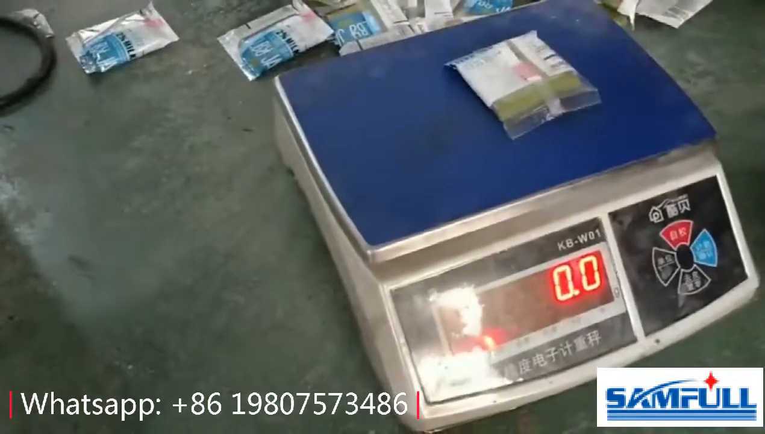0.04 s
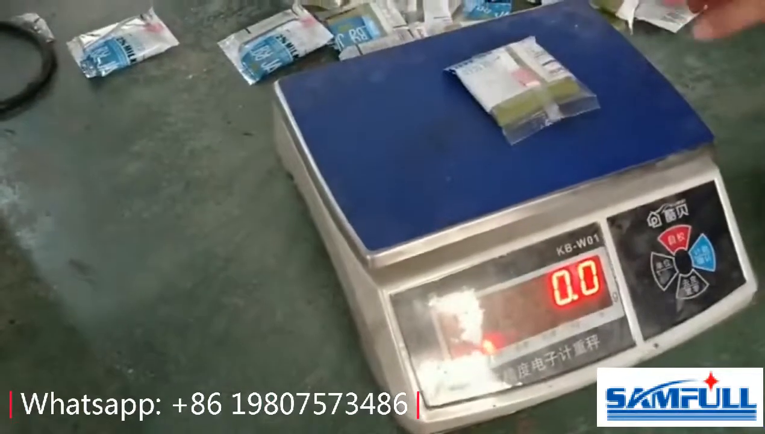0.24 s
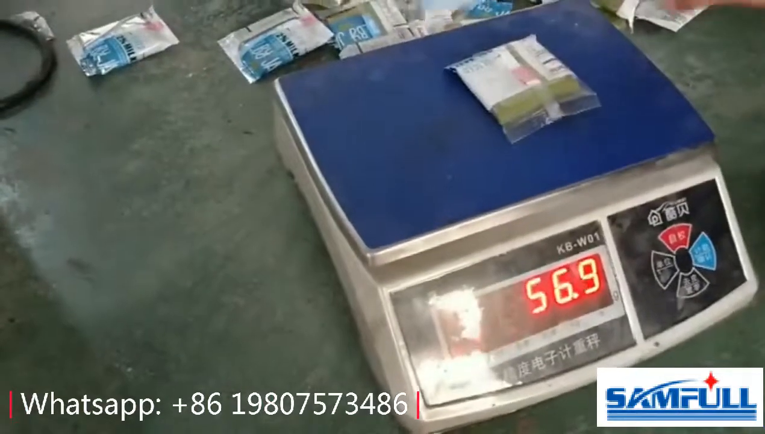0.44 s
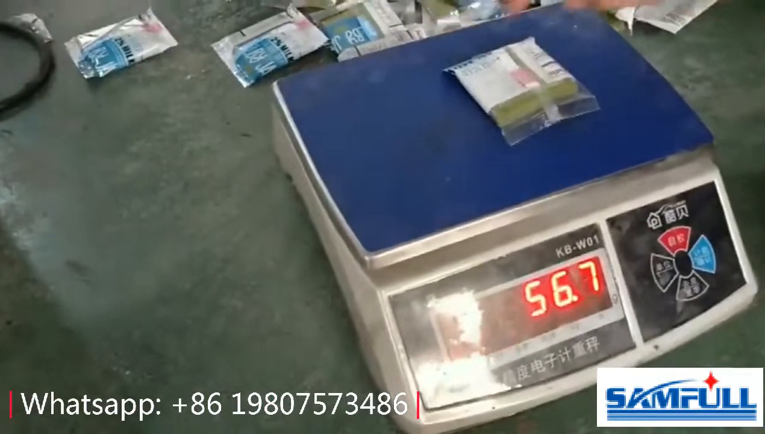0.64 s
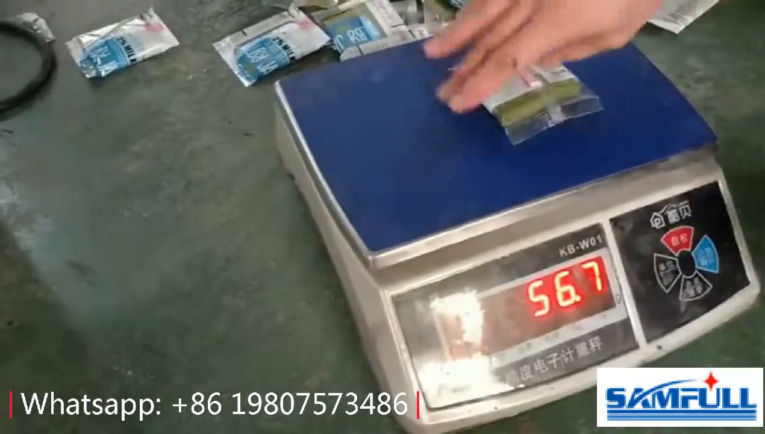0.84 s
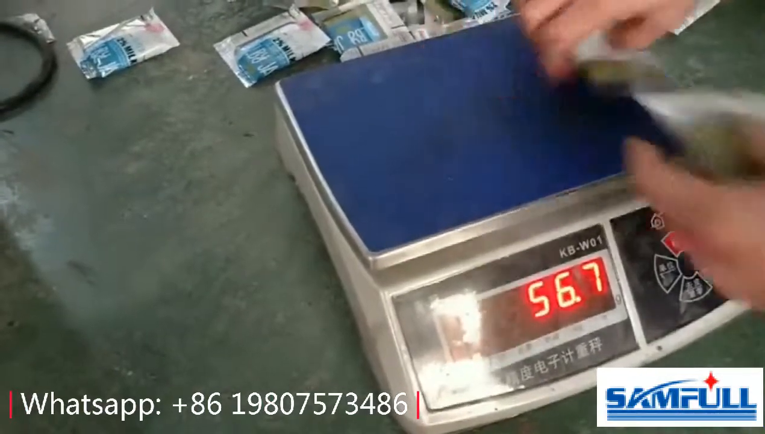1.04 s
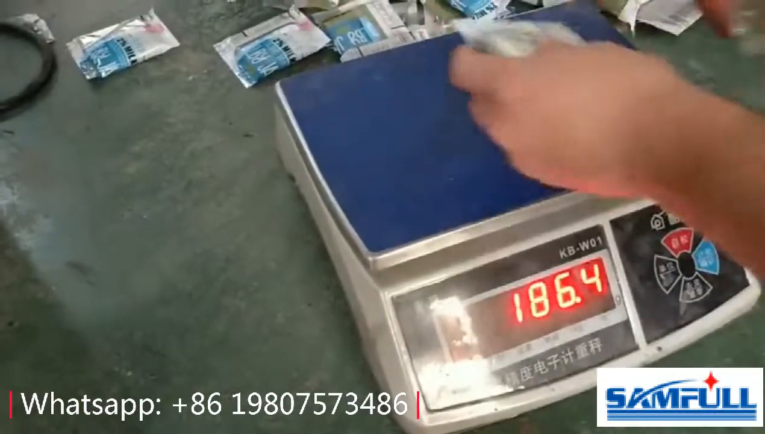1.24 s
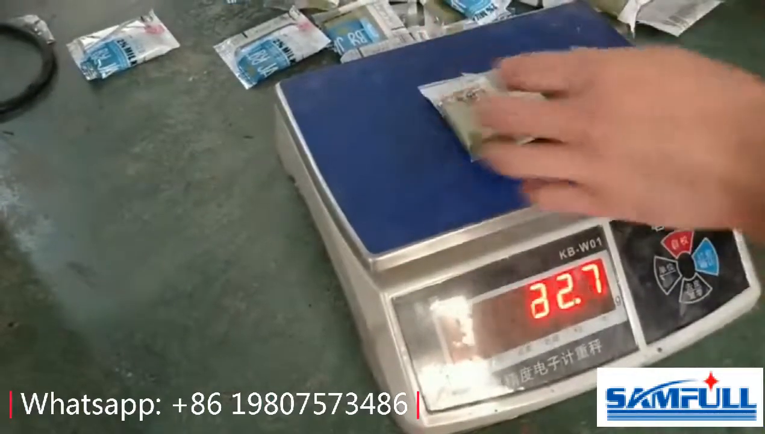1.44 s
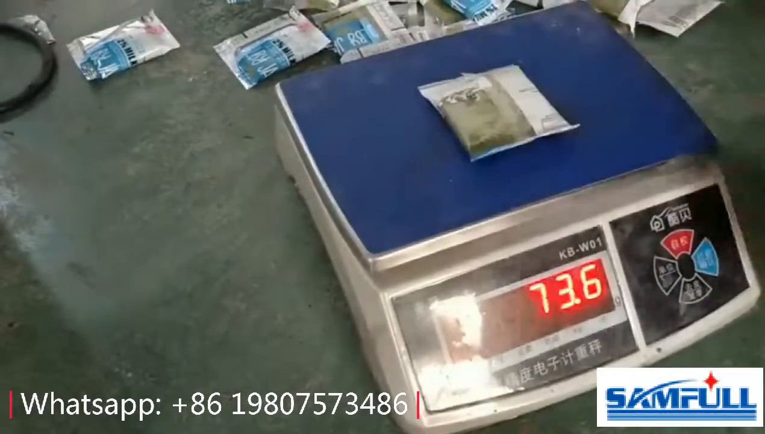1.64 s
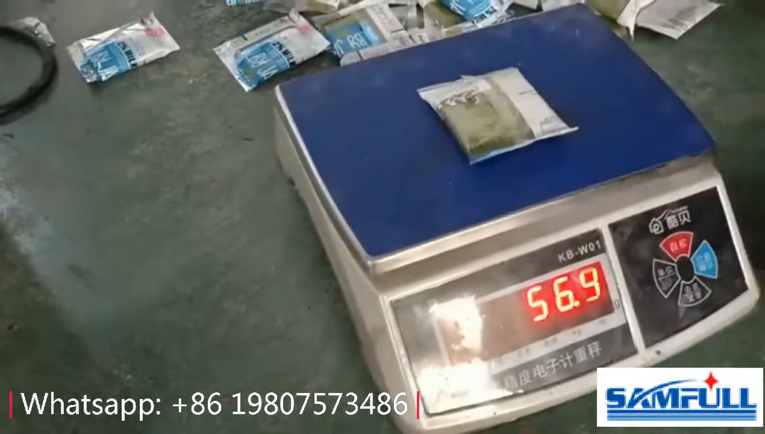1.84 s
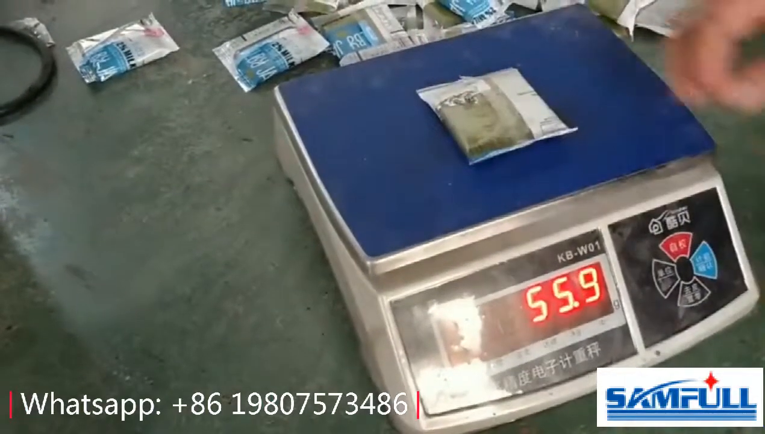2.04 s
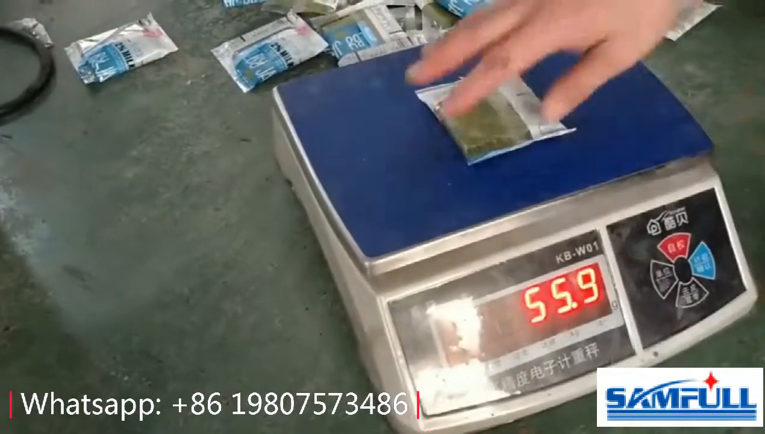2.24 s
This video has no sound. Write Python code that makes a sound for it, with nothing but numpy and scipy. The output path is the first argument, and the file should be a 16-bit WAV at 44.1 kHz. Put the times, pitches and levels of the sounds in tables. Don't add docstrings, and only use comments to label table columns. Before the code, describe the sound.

Crinkly filled packets slap and rattle a metal scale pan over droning factory machines and thin whine

```python
import sys
import numpy as np
from scipy import signal
from scipy.fft import rfft, irfft
from scipy.io import wavfile
from scipy.ndimage import uniform_filter1d

SR = 44100
rng = np.random.default_rng(int(sys.argv[2]) if len(sys.argv) > 2 else 0)


def pcm_store(signal):
    levels = np.round(np.clip(np.atleast_2d(signal), -1, 1) * 32767)
    wavfile.write(sys.argv[1], SR, levels.astype(np.int16).T)


def how_loud(loudness_db):
    steps = np.asarray(loudness_db, float) / 20
    return 10 ** steps


N = 101429
HZ = np.maximum(np.fft.rfftfreq(N, 1 / SR), 1)
TIME = np.arange(N) / SR


def rms_one(x):
    return x / np.sqrt(np.mean(x ** 2) + 1e-20)


def at_hz(points, hz):
    table_hz, values = np.array(points).T[:2]
    return np.interp(np.log(hz), np.log(table_hz), values)


def colour(x, spectrum):
    return rms_one(irfft(rfft(x) * how_loud(at_hz(spectrum, HZ)), N))


def ring(clicks, hz, t60_s):
    radius = how_loud(-60 / (t60_s * SR))
    turn = 2 * np.pi * hz / SR
    return signal.lfilter([0, np.sin(turn)], [1, -2 * radius * np.cos(turn), radius ** 2], clicks + 1e-18)


def grains(per_s, spread_db):
    sizes = how_loud(spread_db * np.minimum(rng.exponential(1, N), 4.0))
    signs = rng.choice([-1, 1], N)
    return rms_one(sizes * signs * (rng.random(N) < per_s / SR))


def swell(start_s, rise_s, t60_s):
    t = TIME - start_s
    rise = np.sin(np.pi / 2 * np.clip(t / rise_s, 0, 1)) ** 2
    return rise * how_loud(-60 * np.maximum(t - rise_s, 0) / t60_s)


# (frequency [Hz], correlation [-])
LIKENESS = [(60, 1), (250, 0.94), (700, 0.7), (1400, 0.029), (12000, 0.)]


def spread(mid, side):
    alike = np.clip(at_hz(LIKENESS, HZ), -.99, .999)
    m = rfft(mid) * np.sqrt((1 + alike) / 2)
    s = rfft(side) * np.sqrt((1 - alike) / 2)
    return irfft(np.array([m + s, m - s]), N)


# (frequency [Hz], t60 [s])
HALL_T60 = [(60, 8.3), (300, 1.23), (1000, 0.61), (4000, 0.41), (12000, 0.68)]


def hall(x):
    t = TIME[:SR]
    tail = 0
    for hz in 45 * 2 ** np.arange(9):
        octave = signal.butter(2, [hz / np.sqrt(2), hz * np.sqrt(2)], "band", fs=SR, output="sos")
        noise = signal.sosfilt(octave, rng.standard_normal((2, SR)))
        fade = how_loud(-60 * t / at_hz(HALL_T60, hz)) * np.clip(t / 0.0052, 0, 1)
        tail = tail + noise * fade / np.sqrt(np.sum(fade ** 2))
    return how_loud(-5.5) * spread(*[signal.fftconvolve(x, side)[:N] for side in tail])


# (frequency [Hz], level [dB per Hz])
DRONE = [(25, -19), (70, -3), (200, 3), (700, -13), (800, -6), (970, -21), (2600, -15.5), (3800, -26)]
# (frequency [Hz], level [dB per Hz])
AIR = [(2500, -19), (4000, -14), (6000, 2), (8200, 16), (8700, -4), (9500, -17), (13500, -57),
       (15000, -11.5)]


def drone():
    out = 0
    for spectrum, rms_db in [(DRONE + [(6000, -32)], -47), (AIR, -48.5)]:
        mid, side = [colour(rng.standard_normal(N), spectrum) for _ in range(2)]
        out = out + how_loud(rms_db) * spread(mid, side)
    return out


WHINE_HZ = [80.5, 187, 7963, 8000, 8037.5, 12040]
# (level [dB rms], width [Hz])
WHINE_LINES = [(-59.5, 34), (-59.5, 4.8), (-56, 11), (-57.5, 23), (-58, 11), (-78, 19)]


def whine():
    lines = 0
    for hz, (db, width_hz) in zip(WHINE_HZ, WHINE_LINES):
        t60_s = 1.85 / width_hz
        noise = rng.standard_normal((2, N + SR // 2))
        line = ring(ring(noise, hz, t60_s), hz, t60_s)[:, -N:]
        lines = lines + how_loud(db) * rms_one(line)
    mid, side = np.sqrt(2) * lines
    return spread(mid, side)


# (frequency [Hz], level [dB rms])
CARRIER = [(8037.6, -57.5), (8022, -59)]


def carrier():
    out = 0
    for hz, db in CARRIER:
        cycles = hz * TIME + rng.random((2, 1))
        out = out + how_loud(db) * np.sqrt(2) * np.sin(2 * np.pi * cycles)
    return out


# (time [s], level [dB])
PUSH = [(0, -43), (.1, -46.5), (0.151, -34), (.21, -31.5), (.28, -29), (.35, -29), (.42, -38), (.55, -46),
        (.8, -44), (1.25, -44), (1.27, -30), (1.37, -31), (1.43, -29), (1.56, -39.5), (1.6, -41.5),
        (1.85, -42), (2.15, -49), (2.22, -44.5)]
# (frequency [Hz], level [dB per Hz])
SHEET = [(40, -65), (90, 0.5), (160, -7.5), (330, -1), (800, -5), (1000, -10.5), (2000, -13), (5000, -36.5)]
# (frequency [Hz], level [dB], t60 [s])
SHEET_MODES = [(250, 6.5, 0.21), (330, 4.5, 0.14), (411, -3, 0.076), (520, 5.5, 0.061), (660, -9, 0.22),
               (740, -20, 0.081), (780, -19, 0.25), (1062, 1.5, 0.16), (1363, 6, 0.038)]


def sheet_metal():
    push_s, push_db = np.transpose(PUSH)
    force = how_loud(np.interp(TIME, push_s, push_db))
    contacts = grains(per_s=900, spread_db=2.5)
    dealt = rng.integers(0, 3, N)
    modes = 0
    for k, (hz, db, t60_s) in enumerate(SHEET_MODES):
        modes = modes + how_loud(db) * rms_one(ring(contacts * (dealt == k % 3), hz, t60_s))
    return force * (how_loud(-2.5) * colour(contacts, SHEET) + how_loud(-21.5) * modes)


PANEL_HZ = [80.5, 187.3]
# (time [s], build-up [s], level [dB rms], t60 [s])
PANEL_SHAKES = [
    [(.275, 0.028, -34, 0.77), (.36, 0.1, -44.5, 0.27), (1.27, 0.028, -40.5, 1), (1.45, 0.034, -40.5, 0.56),
     (1.58, 0.084, -44.5, 0.93), (1.76, 0.061, -48.5, 0.37)],
    [(.25, 0.02, -40, 0.4), (.40, 0.016, -35, 0.2), (.55, 0.042, -41, 1.1), (1.32, 0.022, -36.5, 0.21),
     (1.40, 0.019, -39, 0.26), (1.555, 0.017, -31, 1.6), (1.62, 0.043, -30, 1.58)],
]


def panels():
    out = 0
    for hz, shakes in zip(PANEL_HZ, PANEL_SHAKES):
        power = sum((how_loud(db) * swell(s, rise_s, t60_s)) ** 2 for s, rise_s, db, t60_s in shakes)
        out = out + np.sqrt(2 * power) * np.sin(2 * np.pi * hz * TIME)
    return out


# (time [s], peak [dB], pitch [Hz], t60 [s])
KNOCKS = [(.312, -26, 520, 0.1), (.335, -17.5, 695, 0.035), (.348, -22.5, 292, 0.054),
          (.360, -16.5, 660, 0.016), (.43, -28, 284.4, 0.14), (.225, -30.5, 520, 0.067),
          (.255, -29.5, 601, 0.058), (1.263, -23.5, 292, 0.064), (1.267, -22.5, 594, 0.011),
          (1.281, -20.5, 250, 0.09), (1.294, -28, 276, 0.084), (1.289, -24, 1054, 0.065),
          (1.295, -27.5, 550, 0.067), (1.422, -24, 708, 0.082), (1.429, -16, 780, 0.066),
          (1.445, -28.5, 330, 0.47), (1.50, -28, 310, 0.13), (1.535, -32.5, 330, .1),
          (1.53, -26.5, 763, 0.046), (1.685, -24.5, 250, 0.098), (1.84, -35.5, 343, 0.17),
          (1.94, -35, 244, 0.11), (2.02, -37, 379, 0.097), (.14, -33.5, 1270, 0.037), ]


def knocks():
    out = np.zeros(N)
    for s, db, hz, t60_s in KNOCKS:
        below, above = rng.uniform(-0.64, 1, 2)
        click = np.zeros(N)
        click[int(s * SR)] = how_loud(db)
        out += ring(click, hz, t60_s)
        out += 0.13 * ring(click, hz * (0.719 + 0.095 * below), t60_s)
        out += 0.58 * ring(click, hz * (1.45 + 0.24 * above), 0.42 * t60_s)
    soft = signal.butter(2, [140, 2500], "band", fs=SR, output="sos")
    return signal.sosfilt(soft, out)


# (time [s], peak [dB], pitch [Hz])
TICKS = [(0.139, -40, 1880), (0.935, -39, 1380), (1.239, -32, 5140), (1.546, -31, 5100), (1.238, -44, 1100),
         (1.262, -29.5, 1360), (1.563, -33.5, 2520), (1.564, -33.5, 1250), (1.673, -34, 2160),
         (1.604, -30, 6000), (1.623, -37, 2460), (1.64, -34, 2000), (1.662, -30.5, 1440),
         (1.775, -37, 2760), (1.843, -33, 2600), (2.283, -32.5, 1960)]


def ticks():
    out = np.zeros(N)
    for s, db, hz in TICKS:
        click = np.zeros(N)
        click[int(s * SR) + np.array([0, 90])] = how_loud(db) * np.array([1, -.7])
        t60_s = 24 / hz
        out += ring(click, hz, t60_s) + .6 * ring(click, 1.22 * hz, t60_s)
    return out


# (time [s], peak [dB])
SNAPS = [
    (0.36, -3),
    (.1395, -28.5),
    (0.43, -21),
    (1.6, -29.5),
    (0.380, -15),
    (1.259, -31),
    (1.5744, -42),
]
# (frequency [Hz], level [dB])
SNAP_MODES = [(2630, 1), (5500, -1), (6580, -1.5), (7430, -5), (4200, -6), (7950, -15), (6000, -1.5)]


def snaps():
    out = np.zeros(N)
    for hz, mode_db in SNAP_MODES:
        clicks = np.zeros(N)
        for s, db in SNAPS:
            signs = rng.choice([-1, 1], 4)
            cracks = int(s * SR) + np.array([0, 37, 70, 118])
            clicks[cracks] = how_loud(db + mode_db - 12) * signs * [.8, 1, .8, .45]
        out += ring(clicks, hz, t60_s=.006)
    return signal.sosfilt(signal.butter(4, 8500, fs=SR, output="sos"), out)


# (time [s], swell [s], peak [dB rms], t60 [s], brightness [dB])
CRUMPLES = [(0.137, 0.0015, -40, 0.075, -5.5), (0.139, 0.037, -43, .5, -0.5),
            (0.227, 0.011, -36, 0.81, -1.5), (.32, 0.034, -29, 0.16, -1), (0.354, 0.0085, -22.5, 0.13, 0.5),
            (0.373, 0.002, -23, 0.082, -2.5), (.48, 0.017, -39, 1.22, -1), (0.808, 0.026, -40, 0.66, 1),
            (0.924, 0.016, -38.5, 0.12, 1.5), (1.05, 0.021, -49, 0.055, 4.5),
            (1.232, 0.0045, -35, 0.19, -1), (1.249, 0.003, -31.5, 0.066, 6.5),
            (1.255, 0.0032, -27, 0.069, 1.5), (1.263, 0.0026, -32, 0.14, -5),
            (1.284, 0.0053, -35.5, 0.17, -3), (1.328, 0.011, -34, 1.1, -1), (1.419, 0.014, -32.5, 0.19, -1),
            (1.554, 0.0074, -31.5, 0.14, 0.5), (1.572, 0.0037, -34.5, 0.21, 1),
            (1.6, 0.0038, -33.5, 0.092, 0), (1.619, 0.002, -34.5, 0.088, 2),
            (1.633, 0.007, -35.5, 0.26, -2.5), (1.657, 0.005, -35, 0.14, 2), (1.7, 0.06, -48, 1, -1.5),
            (1.772, .005, -45, 0.11, 2), (1.843, 0.0071, -39, 0.14, 1.5), (1.858, 0.014, -40.5, 0.12, 1.5),
            (2.204, 0.0064, -46, 8.2, 1)]
# (frequency [Hz], level [dB per Hz])
FILM = [(400, -46), (1300, -3), (2600, -4.5), (4000, -10.5), (6600, -5), (8200, -8.5), (9200, -15.5),
        (15500, -19)]
FILM_BANDS_HZ = [0, 1800, 2600, 3800, 5200, 6600, 8800, 12000, SR]


def film():
    creases = rfft([colour(grains(per_s=6000, spread_db=2.2), FILM) for _ in range(2)])
    power = 0
    for s, rise_s, db, t60_s, tilt_db in CRUMPLES:
        levels_db = [[db - tilt_db], [db + tilt_db]]
        power = power + (how_loud(levels_db) * swell(s, rise_s, t60_s)) ** 2
    dull, bright = np.sqrt(power)
    knots = np.arange(2000) * SR / 160
    shared = rng.standard_normal(2000)
    out = 0
    for low_hz, high_hz in zip(FILM_BANDS_HZ, FILM_BANDS_HZ[1:]):
        grip = bright if low_hz >= 3800 else dull
        uneven = .35 * shared + .94 * rng.standard_normal(2000)
        clumps = how_loud(2.6 * np.interp(np.arange(N), knots, uneven) - 1.5)
        band = irfft(creases * ((HZ >= low_hz) & (HZ < high_hz)), N)
        out = out + grip * clumps * band
    return spread(*out)


def scene():
    low = sheet_metal() + knocks()
    packets = film() + ticks()
    cracks = snaps()
    scuff = spread(low, np.roll(low, 130))
    near = scuff + panels() + packets + cracks * how_loud([[2.0], [-2.5]])
    tail = hall(low + packets[0] + 0.63 * cracks)
    return near + tail + drone() + whine() + carrier()


# (frequency [Hz], left minus right [dB])
LEAN = [(100, 0.5), (700, -0.2), (2000, 1.5), (5000, 5.5), (8000, -2), (12000, 4)]


def lean_left(x):
    half_db = at_hz(LEAN, HZ) * np.array([[.5], [-.5]])
    return irfft(rfft(x) * how_loud(half_db), N)


# (frequency [Hz], level [dB per line])
GATE = [(3000, -102), (3700, -84), (4200, -83), (5000, -102), (8300, -100), (8800, -79), (11800, -80),
        (12040, -84), (12300, -80), (14300, -81), (14900, -92)]


def drop_quiet(x):
    hz, _, z = signal.stft(x, SR, nperseg=2048, noverlap=1024)
    width = 8
    centre = hz[width // 2::width, None]
    power = (np.abs(z[:, :1024]) ** 2).reshape(2, -1, width, z.shape[2]).mean(axis=2)
    power_db = 10 * np.log10(power + 1e-20)
    loud_db = power_db[:, 4:46].mean(axis=(0, 1))
    rise_db = loud_db - np.median(loud_db)
    waver, patch = [uniform_filter1d(rng.standard_normal(power_db.shape[1:]), size=2) * np.sqrt(2)
                    for _ in range(2)]
    threshold_db = at_hz(GATE, centre) + .25 * rise_db + .75 * np.clip(rise_db, 0, 6) + 2.6 * waver
    over_db = power_db - threshold_db
    hole = (patch < -2.2) & (centre > 3200) & (centre < 7400)
    over_db = np.where(hole, -1, over_db)
    patchy = (centre > 2400) & (np.abs(centre - 8000) > 300)
    z[:, :1024] *= np.repeat(how_loud(2.0 * patch * patchy), width, axis=0)
    z[:, :1024] *= np.repeat(np.clip(over_db + .5, 0, 1), width, axis=1)
    z = z * (hz < 15600)[:, None]
    return signal.istft(z, SR, nperseg=2048, noverlap=1024)[1][:, :N]


def low_pass(x):
    return signal.sosfilt(signal.butter(12, 16250, fs=SR, output="sos"), x)


def record(dry):
    mix = drop_quiet(lean_left(dry))
    return low_pass(mix)


dry = scene()
out = record(dry)
pcm_store(out)
```